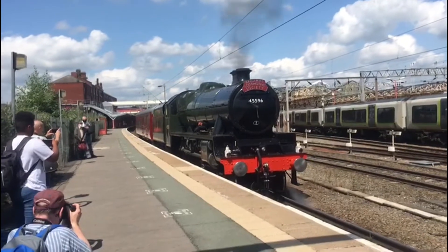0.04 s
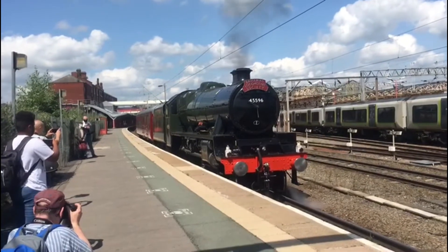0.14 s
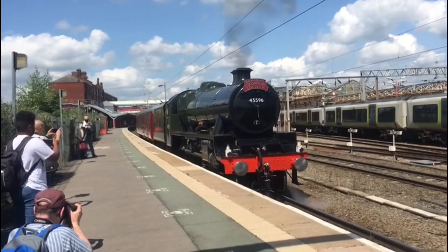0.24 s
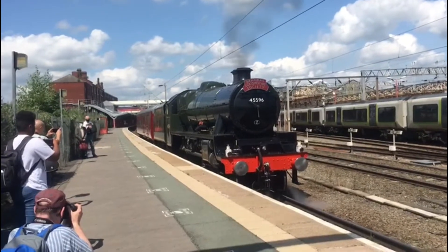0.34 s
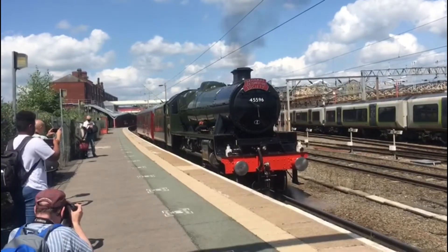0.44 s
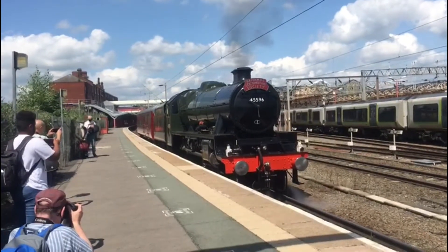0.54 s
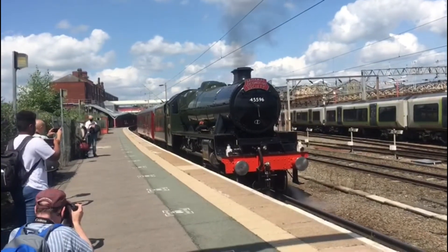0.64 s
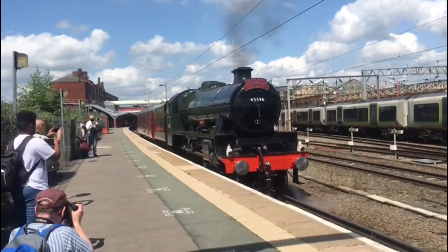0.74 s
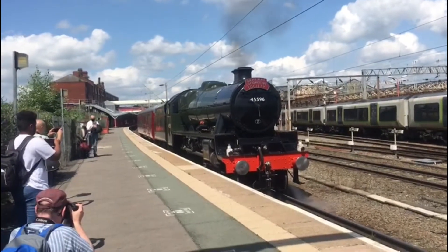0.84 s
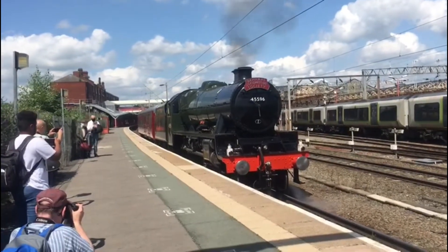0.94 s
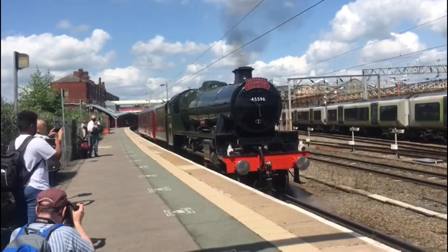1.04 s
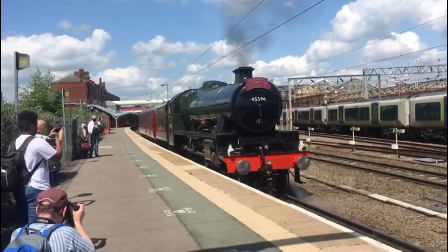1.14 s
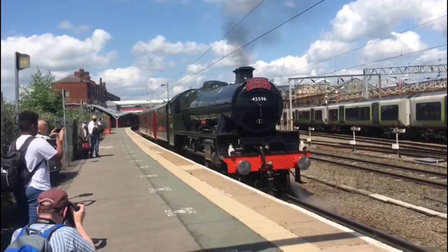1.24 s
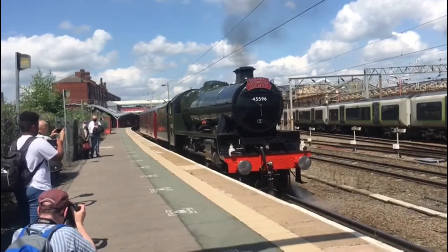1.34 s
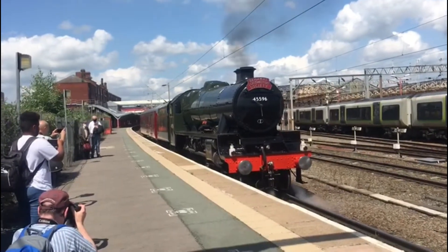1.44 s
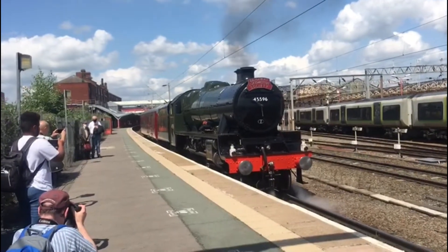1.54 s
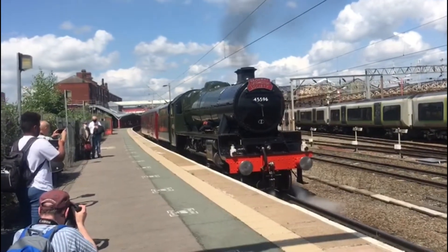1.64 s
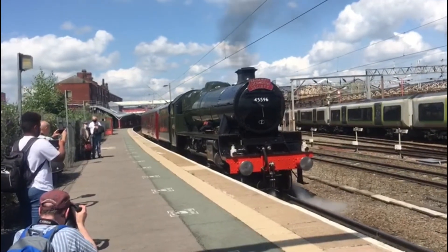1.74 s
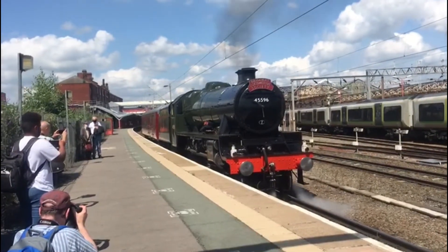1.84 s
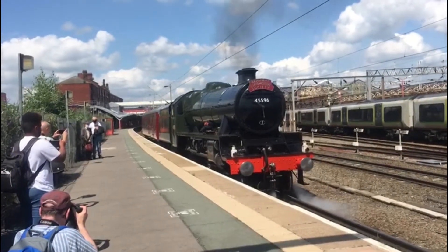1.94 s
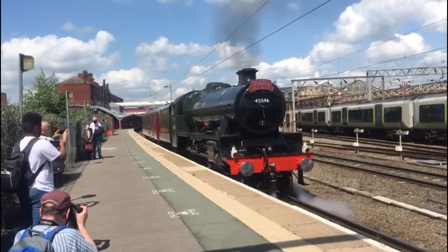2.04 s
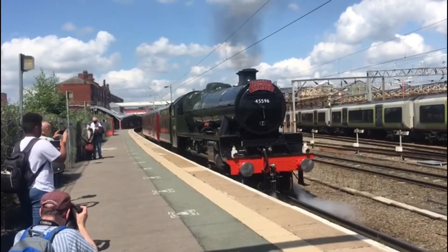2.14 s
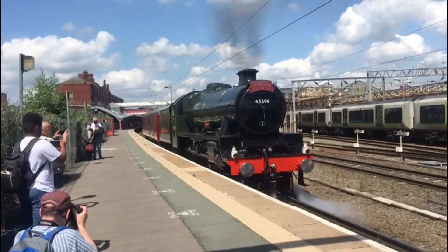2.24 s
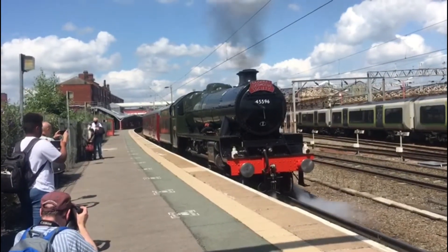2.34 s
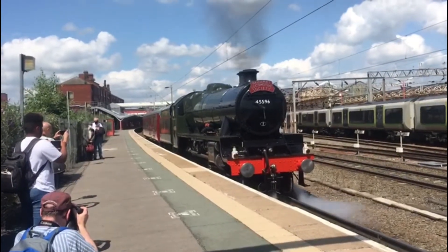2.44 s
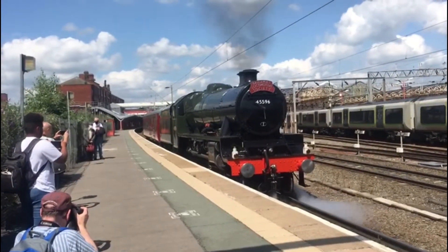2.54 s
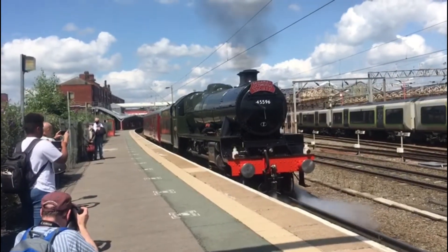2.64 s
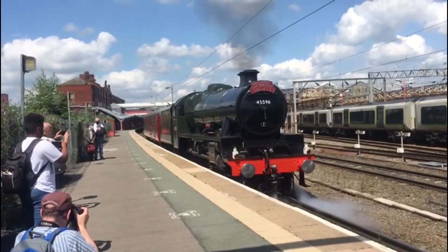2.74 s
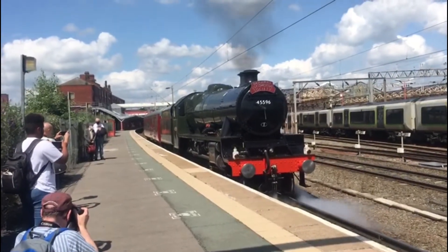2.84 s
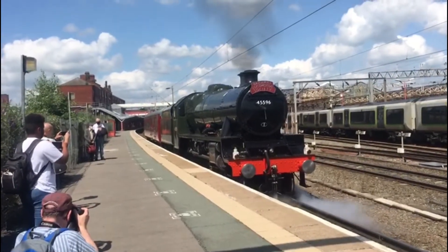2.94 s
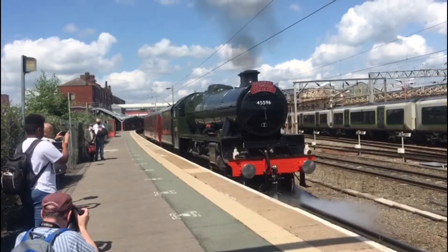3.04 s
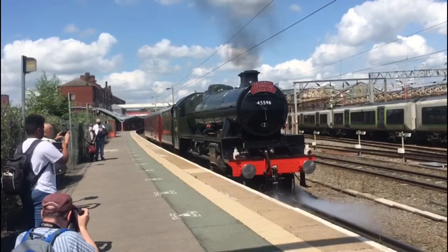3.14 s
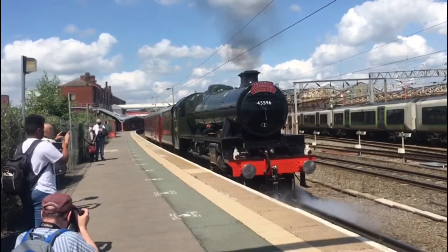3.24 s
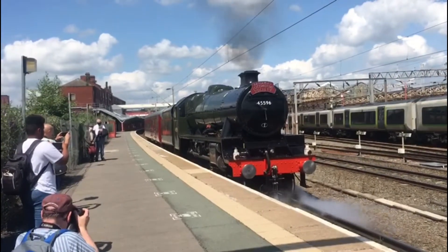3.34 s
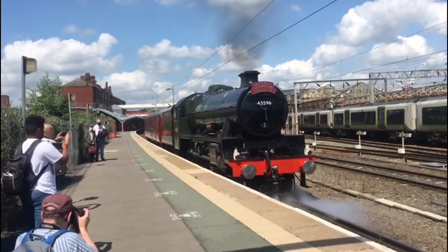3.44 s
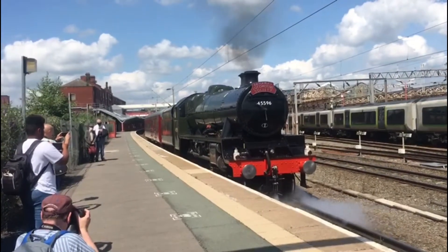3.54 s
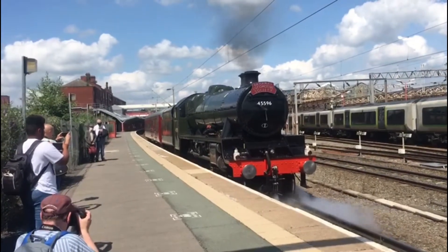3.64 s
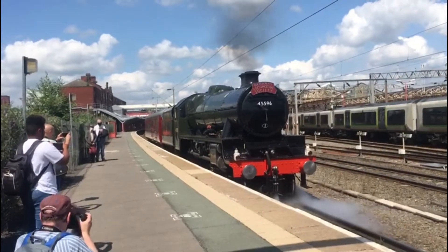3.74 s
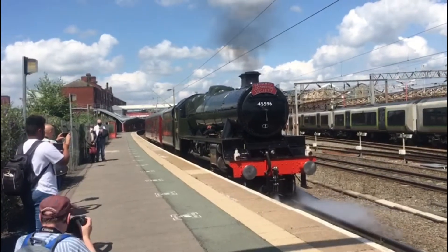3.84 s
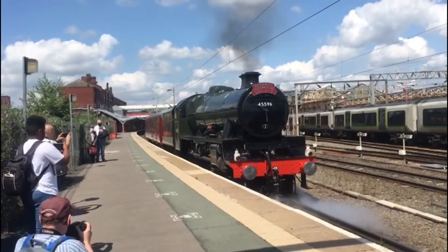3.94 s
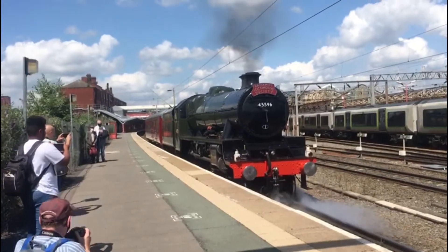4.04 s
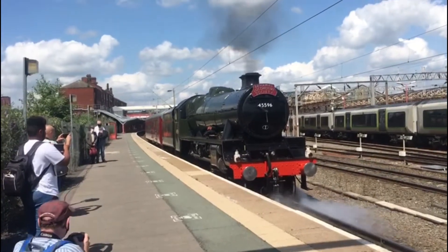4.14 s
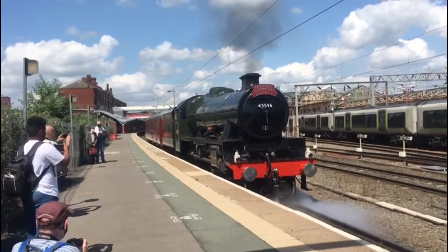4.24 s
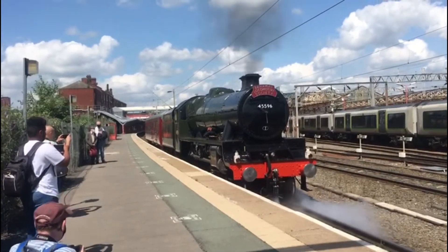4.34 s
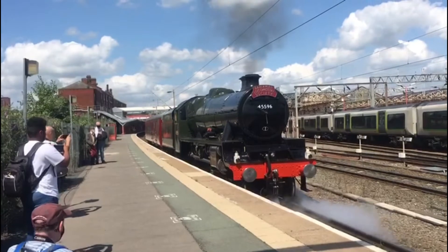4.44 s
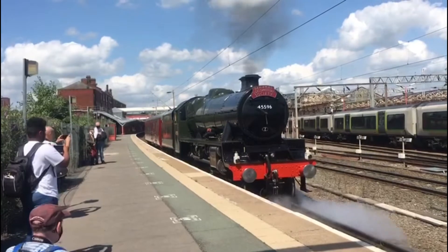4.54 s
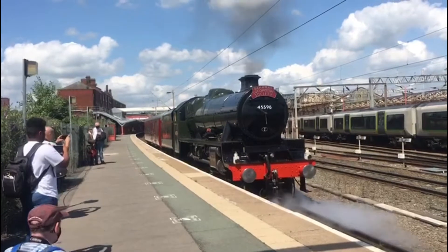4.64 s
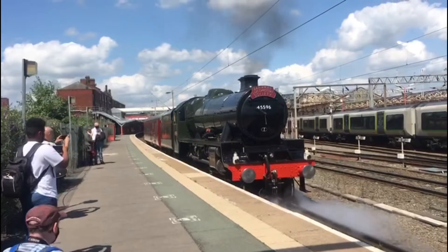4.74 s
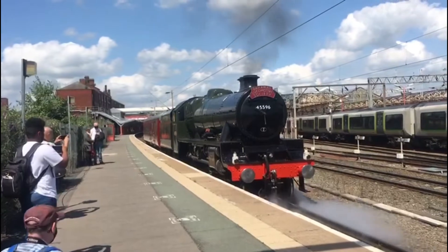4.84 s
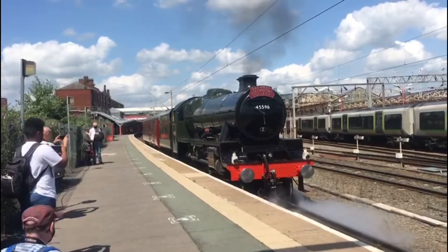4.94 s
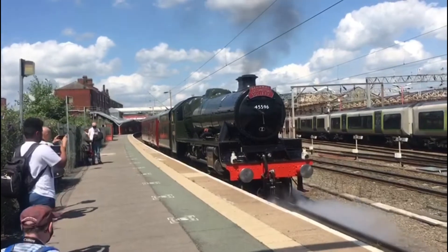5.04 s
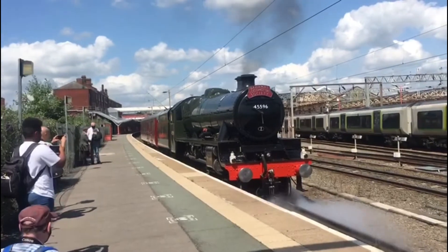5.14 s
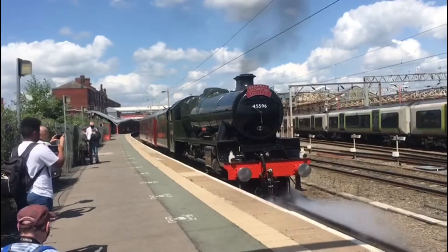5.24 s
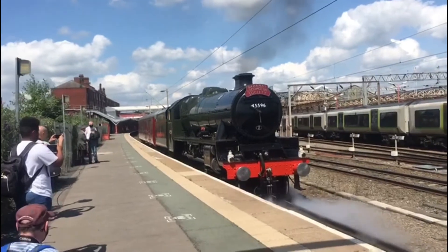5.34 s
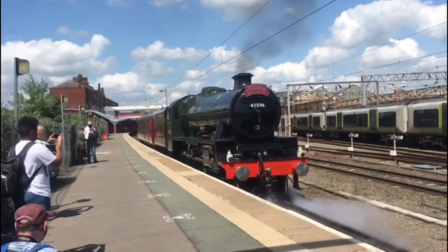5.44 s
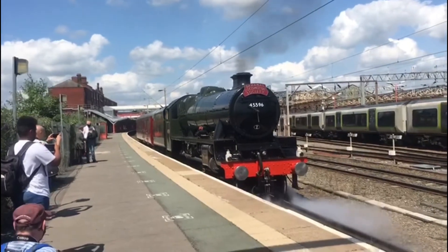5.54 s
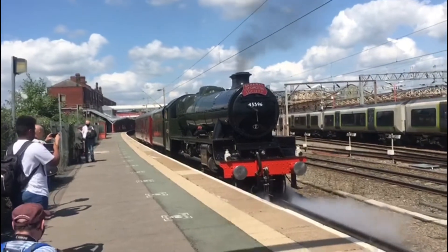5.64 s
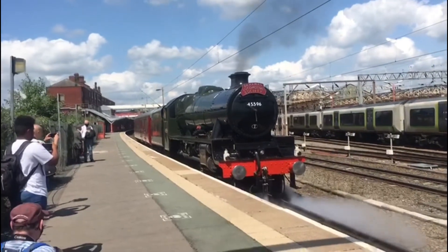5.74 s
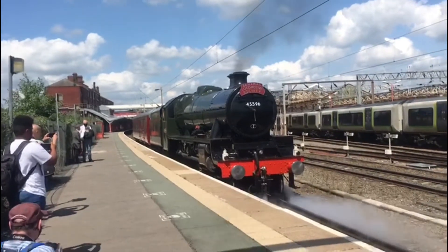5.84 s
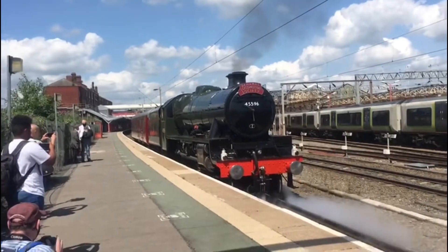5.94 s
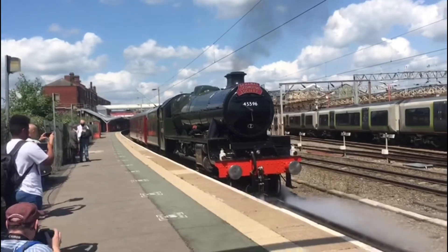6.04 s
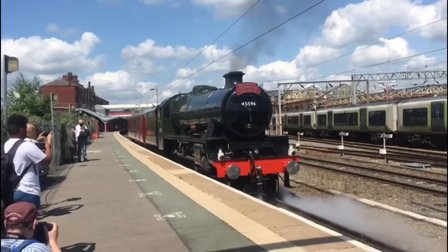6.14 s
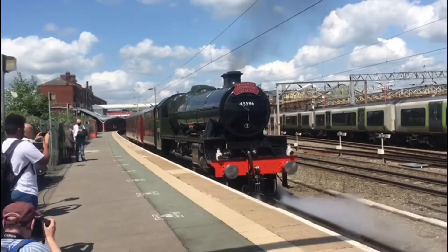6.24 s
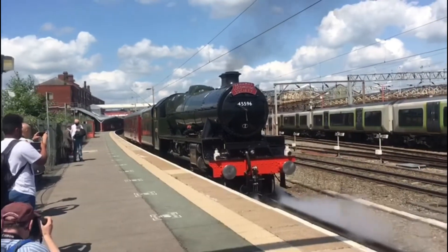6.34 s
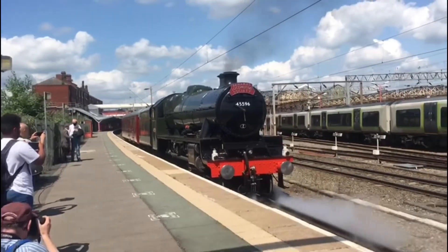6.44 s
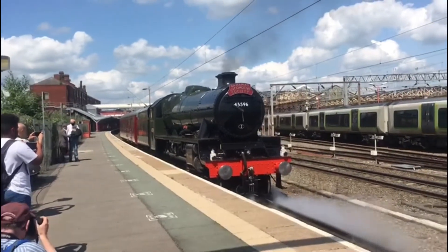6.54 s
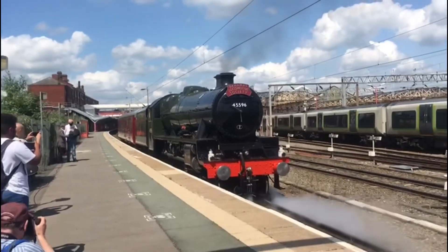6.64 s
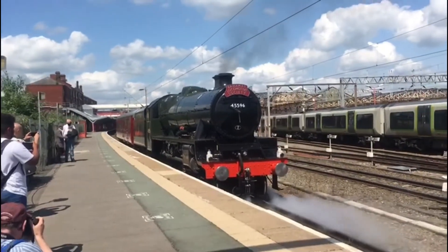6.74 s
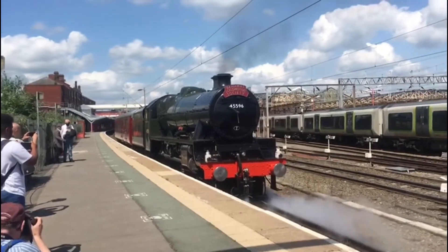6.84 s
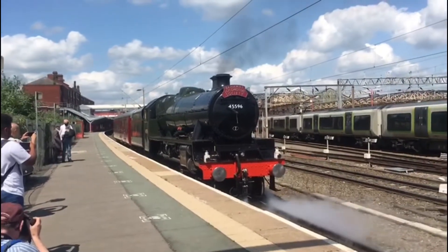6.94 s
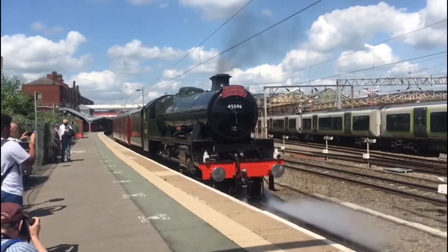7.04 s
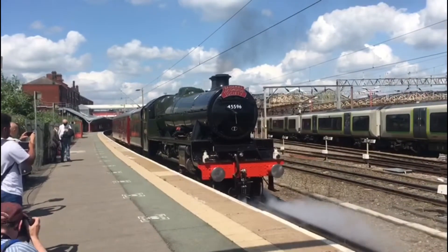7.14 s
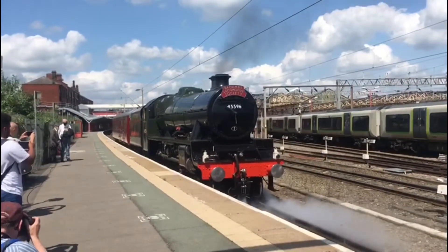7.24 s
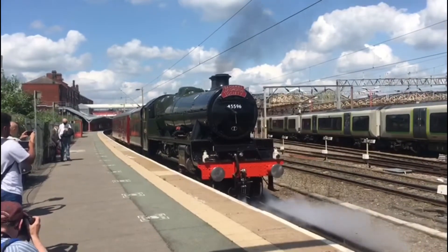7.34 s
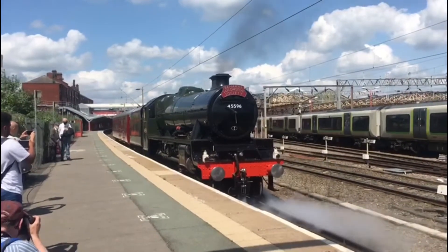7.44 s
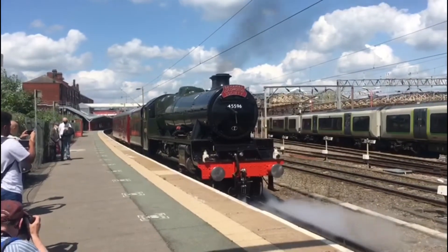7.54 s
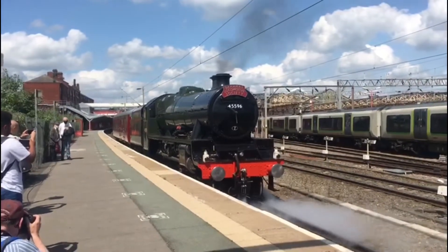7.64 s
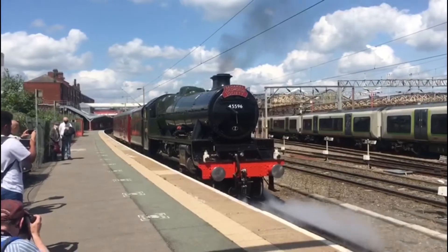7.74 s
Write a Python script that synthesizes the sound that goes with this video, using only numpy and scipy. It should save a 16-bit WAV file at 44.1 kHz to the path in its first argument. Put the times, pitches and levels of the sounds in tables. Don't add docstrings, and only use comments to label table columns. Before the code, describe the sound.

Open-air station platform, one handheld microphone in front of a standing steam locomotive. From 0 to 1.5 s it is fairly quiet: soft steady chimney hiss, low drone near 50 Hz, dull firebox draught, faint distant machine whines, and a thin wavering whistle around 2.2 kHz pulsing roughly every 0.4 s, strongest near 1.1 s, gone by about 1.6 s. A fine fizz grows around 0.7 to 1.1 s. From 1.5 s steam jets from the cylinder drains, first bright and singing, swelling rapidly to full force by 2.8 s. Then a dense, turbulent roar continues to 7.8 s, with pipe ring around 3 to 3.5 kHz rising and falling, sizzling treble and small watery surges. The low bed drops back between 3 and 4 s. Gusts rumble from 4.9 s, with sharp wind pops near 6.6 to 6.9, 7.3 and 7.7 s. Treble is slightly grainy, almost mono.

```python
import sys
import numpy as np
from scipy import signal
from scipy.fft import rfft, irfft, next_fast_len
from scipy.io import wavfile
from scipy.ndimage import uniform_filter1d, map_coordinates

SR = 44100
rng = np.random.default_rng(int(sys.argv[2]) if len(sys.argv) > 2 else 0)


def amplitude_ratio(level_db):
    exponent = np.asarray(level_db, float) / 20
    return 10 ** exponent


def wav_out(sig):
    wavfile.write(sys.argv[1], SR, np.round(np.clip(np.atleast_2d(sig).T, -1, 1) * 32767).astype(np.int16))


N = 343539
BLOCK = 1024

# start_s, steam_flow_db, pipe_ring_over_roar_db (wet steam damps the ring)
DRAIN_COCKS = [(0, -39, -8), (.65, -37.5, 2), (1.12, -37.5, 1.5), (1.5, -30.5, 7), (2, -26.5, 5.5),
               (2.25, -23, 6), (2.8, -20, 5.5), (3, -22, 4), (3.34, -20.5, 0.5), (4.05, -21.5, 6),
               (4.55, -20.5, -5.5), (4.9, -20.5, 1.5), (5.14, -20.5, -9), (5.45, -21, 4.5), (6, -21, -0.5),
               (6.7, -21, 2.5), (7.1, -22, 1.5), (7.4, -20.5, 1)]


def unit(x):
    return x / np.sqrt(np.mean(x ** 2) + 1e-20)


def along(points, hz):
    f, v = np.transpose(points)
    return np.interp(np.log(hz + 1), np.log(f + 1), v)


def curves(rows):
    s, *columns = np.transpose(rows)
    t = np.arange(N) / SR
    return [np.interp(t, s, column) for column in columns]


def wobble(rate):
    coarse = np.arange(0, N + 64, 64)
    knots = rng.standard_normal(int(N * rate / SR) + 4)
    curve = map_coordinates(knots, [coarse * rate / SR])
    return np.interp(np.arange(N), coarse, curve)


def filtered(x, response):
    m = next_fast_len(x.shape[-1] + 8192)
    spectrum = rfft(x, m) * response(np.fft.rfftfreq(m, 1 / SR))
    return irfft(spectrum, m)[..., :x.shape[-1]]


def modes(table):
    def response(f):
        total = 0
        for k, (centre, width, db) in enumerate(table):
            peak = 1j * f * width / (centre * centre - f * f + 1j * f * width)
            total = total + (-1) ** k * amplitude_ratio(db) * peak
        return total
    return response


def rush(response, patchy_db):
    z = signal.stft(rng.standard_normal(N), nperseg=512)[2]
    eddies = uniform_filter1d(rng.standard_normal(z.shape), size=6, axis=0)
    eddies = unit(uniform_filter1d(eddies, size=16, axis=1))
    noise = signal.istft(z * amplitude_ratio(patchy_db * eddies), nperseg=512)[1][:N]
    return unit(filtered(noise, response))


def blower():
    # pitch_hz, level_db per Hz
    chimney_color = [(260, -42), (450, -21), (644, -0.5), (730, -3), (830, -5), (970, -2), (1390, -15.5),
                     (1670, 0), (2050, -11.5), (3000, -1.5), (3500, -1), (4680, -9), (5700, -3),
                     (9700, -18), (10300, -14), (12100, -13), (15700, -60)]
    # start_s, level_db
    draw = [(0, -35.5), (.5, -33), (1.3, -32.5), (2.8, -30), (7.79, -39)]
    return amplitude_ratio(curves(draw)[0]) * rush(lambda f: amplitude_ratio(along(chimney_color, f)), patchy_db=1.0)


def valve():
    # length_s, level_db, pitch_hz
    strokes = [
        (0.365, -46, 2280),
        (0.228, -39, 2250),
        (0.27, -41, 2275),
        (0.355, -34.5, 2240),
        (0.16, -38, 2220),
    ]
    first_s, stroke_s, edge_s = -.27, .41, .015
    between_db, quiet_s = -43, 1.63
    t = np.arange(N) / SR
    length, db, pitch = np.transpose(strokes)
    start = first_s + stroke_s * np.arange(len(strokes))
    end = start + length
    gates = np.clip(np.minimum(t - start[:, None], end[:, None] - t) / edge_s, 0, 1)
    level = amplitude_ratio(db) @ gates + amplitude_ratio(between_db) * np.clip(quiet_s - t, 0, 1)
    hz = np.interp(t, start + length / 2, pitch) + 22 * wobble(90)
    phase = 2 * np.pi * np.cumsum(hz) / SR
    breath = unit(filtered(rng.standard_normal((2, N)), lambda f: 1 / (1 + (f / 110) ** 2)))
    return level * ((1 + .5 * breath[0]) * np.cos(phase) + .5 * breath[1] * np.sin(phase))


def undertone():
    # pitch_hz, level_db per Hz
    drone_color = [(12, -60), (24, -34), (36, -14), (44, -4), (51, 0), (62, -6), (78, -6), (90, -10),
                   (140, -13), (180, -40), (300, -120)]
    # pitch_hz, level_db per Hz
    draught_color = [(65, -31), (110, -9.5), (145, -6.5), (188, 3), (230, 0.5), (290, -4), (355, 0),
                     (420, -11.5), (495, -6.5), (534, -10.5), (600, -1.5), (700, -19), (1000, -120)]
    # start_s, share_of_cut
    turned = [
        (2.85, 0.086),
        (3, 0.33),
        (4.1, 0.91),
    ]
    # centre_s, half_length_s, lift_db
    gusts = [(1.05, 0.074, 4.5), (1.3, 0.11, 3), (4.17, 0.11, 3), (4.86, 0.08, 11), (5.12, .07, 7),
             (5.658, 0.12, 7), (5.88, 0.063, 9), (6.14, 0.065, 5), (6.54, 0.061, 13), (6.67, 0.052, 12),
             (6.83, .07, 6), (7.16, .12, 12), (7.44, .06, 4), (7.66, .08, 8), (7.79, 0.041, 15)]
    drone_level_db, drone_cut_db = -42.5, -9.5
    draught_level_db, draught_cut_db, draught_gust_share = -42, -6, 0.46
    t = np.arange(N) / SR
    cut = curves(turned)[0]
    gust_db = sum(db * np.exp(-((t - s) / half) ** 2) for s, half, db in gusts)
    drone_db = drone_level_db + drone_cut_db * cut + gust_db
    draught_db = draught_level_db + draught_cut_db * cut + draught_gust_share * gust_db
    hum = rush(lambda f: amplitude_ratio(along(drone_color, f)), patchy_db=1.0)
    hum = unit(hum / np.sqrt(np.abs(uniform_filter1d(hum ** 2, size=4000)) + .15))
    drone = amplitude_ratio(drone_db + 0.38 * wobble(6)) * hum
    draught = amplitude_ratio(draught_db) * rush(lambda f: amplitude_ratio(along(draught_color, f)), patchy_db=0.4)
    return drone + draught


def far_machines():
    # start_s, end_s, pitch_hz, level_db
    tones = [
        (-.3, 2.9, 50, -47),
        (-.3, 1.35, 317.3, -48.5),
        (1.25, 2.3, 317.3, -53),
        (2.2, 3.6, 317.3, -57),
        (.9, 2.1, 978, -53),
        (7.3, 7.62, 238, -52),
    ]
    fade_s = .08
    t = np.arange(N) / SR
    out = np.zeros(N)
    for start, end, hz, db in tones:
        swell = np.clip(np.minimum(t - start, end - t) / fade_s, 0, 1)
        level = amplitude_ratio(db + 3 + .8 * wobble(8))
        out += swell * level * np.sin(2 * np.pi * np.cumsum(hz + 1.5 * wobble(9)) / SR)
    return out


def near(f):
    # delay_ms, level_db
    surfaces = [(1.72, -20), (3.75, -23), (6.9, -25), (8.7, -24), (13.4, -24)]
    blur_db = 2.1 * np.maximum(f - 3000, 0) / 1000
    return 1 + sum(amplitude_ratio(db - blur_db) * np.exp(-2j * np.pi * f * ms / 1000) for ms, db in surfaces)


def slugs(rate, fade_s):
    kicks = (rng.random(N) < rate / SR) * rng.exponential(size=N)
    kicks = uniform_filter1d(kicks, size=200)
    surge = signal.lfilter([1], [1, -np.exp(-1 / (fade_s * SR))], kicks)
    return unit(surge - surge.mean())


def fine_hiss(flow_db, surge):
    # pitch_hz, level_db per Hz
    fizz_color = [(2530, -21), (4300, -10.5), (4830, -5.5), (6540, 1.5), (7680, -2.5), (9410, -1),
                  (10400, -7.5), (11300, -8.5), (11800, -13), (12100, -19), (15700, -50), (22000, -120)]
    # start_s, level_db
    weep = [
        (0, -40),
        (.65, -35),
        (.98, -34.5),
        (1.12, -41),
        (1.5, -60),
    ]
    full_db, hiss_over_db, hiss_grows = -20.5, 4, 1.36
    cloud_s, cloud_grows_s, cloud_db = 3.28, 0.31, -1.5
    t = np.arange(N) / SR
    dulled_db = cloud_db * (1 - np.exp(-np.maximum(t - cloud_s, 0) / cloud_grows_s))
    jet_db = full_db + hiss_over_db + hiss_grows * (flow_db - full_db) + dulled_db
    level = np.hypot(amplitude_ratio(jet_db), amplitude_ratio(curves(weep)[0]))
    return level * amplitude_ratio(0.8 + 0.14 * surge) * rush(lambda f: near(f) * amplitude_ratio(along(fizz_color, f)), patchy_db=1.06)


def roar(flow_db, surge):
    # pitch_hz, level_db per Hz
    roar_color = [(150, -49), (250, -28), (357, -14), (410, -40), (490, -16.5), (549, -29), (608, -10),
                  (890, -6.5), (1250, 0), (1700, -0.5), (1860, 1), (2650, -1), (3380, 0.5), (4520, -7),
                  (5200, -22), (6760, -20), (11400, -120)]
    # pitch_hz, width_hz, level_db
    hollow = [(590, 28, -5), (957, 27, 0), (1120, 20, -3.5), (1440, 210, -4), (1560, 130, -4),
              (1950, 39, -5.5), (2170, 83, -12)]

    def color(f):
        boxed = np.sqrt(1 + 3 * np.abs(modes(hollow)(f)) ** 2)
        return near(f) * boxed * amplitude_ratio(along(roar_color, f))
    return amplitude_ratio(flow_db + 3.0 + 0.21 * surge) * rush(color, patchy_db=0.6)


def pipe_ring(ring_db, surge):
    # pitch_hz, width_hz, level_db
    nozzle = [(3034, 380, -0.5), (3500, 310, 0.5), (4180, 720, -4), (2566, 360, -6)]
    return amplitude_ratio(ring_db - 3 + 0.27 * surge) * rush(lambda f: near(f) * modes(nozzle)(f) ** 2, patchy_db=1.0)


def slit_song(flow_db, surge):
    # pitch_hz, width_hz, level_db
    slit = [(5600, 1100, -1.5), (6500, 700, -1), (7050, 800, -1), (8400, 1200, -4)]
    from_s, to_s, fade_s = 1.1, 2.83, .4
    over_flow_db, left_db = -2.5, -11
    t = np.arange(N) / SR
    half_open = np.clip(1 + np.minimum(t - from_s, to_s - t) / fade_s, 0, 1)
    sing_db = flow_db + over_flow_db + left_db * (1 - half_open)
    return amplitude_ratio(sing_db + .6 * surge) * rush(lambda f: modes(slit)(f) ** 2, patchy_db=.8)


def jets():
    flow_db, ring_over_db = curves(DRAIN_COCKS)
    surge = slugs(rate=8, fade_s=0.012)
    steam = fine_hiss(flow_db, surge) + roar(flow_db, surge)
    return steam + pipe_ring(flow_db + ring_over_db, surge) + slit_song(flow_db, surge)


def wind():
    # centre_s, peak_db, pitch_hz
    pops = [(4.86, -34.5, 55), (6.514, -37, 170), (6.559, -29, 210), (6.645, -29, 110), (6.662, -29, 400),
            (6.667, -24, 210), (6.796, -27, 380), (6.799, -30, 120), (6.842, -30, 100), (6.883, -34, 90),
            (7.327, -32, 160), (7.635, -31.5, 170), (7.69, -32, 150), (7.765, -30, 300)]
    out = np.zeros(N)
    t = np.arange(-BLOCK, BLOCK) / SR
    for s, db, hz in pops:
        i = round(s * SR) - BLOCK
        out[i:i + 2 * BLOCK] -= amplitude_ratio(db) * np.cos(2 * np.pi * hz * t) * np.exp(-(1.3 * hz * t) ** 2)
    return out


def scene():
    mono = blower() + valve() + undertone() + far_machines() + jets() + wind()
    return np.array([mono, mono])


def starved(x, weak_db):
    shape = dict(fs=SR, nperseg=2 * BLOCK, noverlap=3 * BLOCK // 2)
    hz, t, z = signal.stft(x, **shape)
    power = np.abs(z) ** 2
    cell = uniform_filter1d(uniform_filter1d(power, size=2, axis=0), size=3, axis=1)
    around = uniform_filter1d(uniform_filter1d(power, size=40, axis=0), size=8, axis=1)
    bar_db = weak_db + np.interp(hz, [1500, 3500, 7500, 9500, 10500], [-30, -2.5, -.5, 0, 1.3])
    jumps = np.clip(rng.normal(0.3, .6, len(t) // 3 + 1), 0, 1.2)
    edge_hz = 11740 + 300 * np.repeat(jumps, 3)[:len(t)]
    keep = (cell > around * amplitude_ratio(2 * bar_db)[:, None]) * (hz[:, None] < edge_hz)
    return signal.istft(z * keep, **shape)[1][:N]


def band(x, s, length_s, low_hz, high_hz):
    n = round(length_s * SR)
    i = round(s * SR) - n // 2
    piece = filtered(x[i - BLOCK:i + n + BLOCK], lambda f: (f > low_hz) * (f < high_hz))
    return i, piece[BLOCK:BLOCK + n]


def dropouts(mono):
    # centre_s, length_s, low_hz, high_hz, loss_db
    holes = [(1.185, 0.13, 9950, 10600, -30), (1.581, .05, 9770, 10900, -16),
             (3.025, 0.18, 10350, 11000, -40), (4.1, 0.055, 10200, 11000, -15),
             (4.598, .07, 10050, 10250, -14), (6.05, .05, 10000, 10400, -7.5)]
    out = mono.copy()
    for s, length_s, low_hz, high_hz, loss_db in holes:
        i, piece = band(out, s, length_s, low_hz, high_hz)
        out[i:i + len(piece)] -= (1 - amplitude_ratio(loss_db)) * signal.windows.tukey(len(piece), .6) * piece
    return out


def wide_patches(mono):
    # centre_s, low_hz, high_hz, level_db
    splits = [(.535, 8900, 11050, -4), (1.301, 5180, 7650, -2), (1.998, 5550, 6950, -3),
              (1.998, 9550, 11750, -4), (2.045, 4580, 6370, -6), (2.114, 4170, 5180, -4),
              (2.3, 5550, 6950, -2), (3.438, 4620, 6300, -2), (3.485, 4200, 6350, -5),
              (3.925, 8200, 11100, -3), (4.065, 5130, 6320, -2), (4.065, 9550, 11000, -6),
              (4.622, 6800, 8350, -3), (5.505, 5150, 6200, -2), (5.806, 7500, 9050, -3),
              (5.806, 4170, 5200, -7), (6.502, 6240, 7650, -2), (6.502, 10250, 11750, -4),
              (7.06, 9550, 11100, -2), (7.385, 10250, 11750, 1.5), (7.408, 10250, 11750, -2)]
    earlier = np.roll(mono, 3 * BLOCK)
    side = np.zeros(N)
    for s, low_hz, high_hz, db in splits:
        i, piece = band(earlier, s, 2 * BLOCK / SR, low_hz, high_hz)
        side[i:i + len(piece)] += amplitude_ratio(db) * np.hanning(len(piece)) ** 0.55 * piece
    return side


def roll_off(x):
    return signal.sosfilt(signal.butter(12, 13020, fs=SR, output="sos"), x)


def record(dry):
    squeezed = dry[0] / (1 + np.abs(dry[0] / .95) ** 6) ** (1 / 6)
    mono = dropouts(starved(squeezed, weak_db=-2.5))
    side = wide_patches(mono)
    return roll_off(np.array([mono + side, mono - side]))


dry = scene()
out = record(dry)
wav_out(out)
```